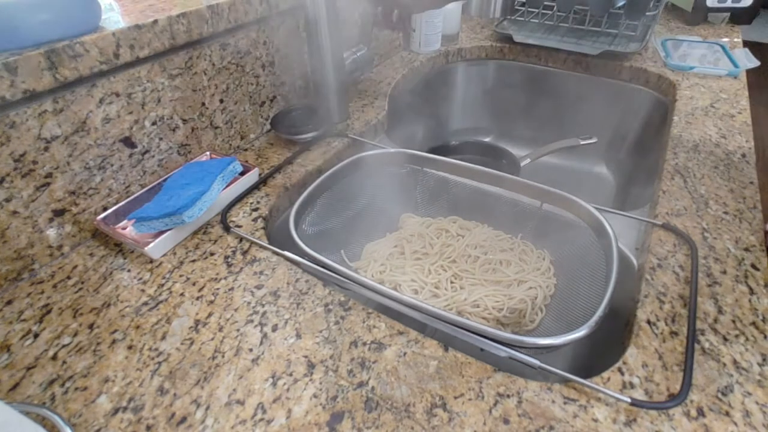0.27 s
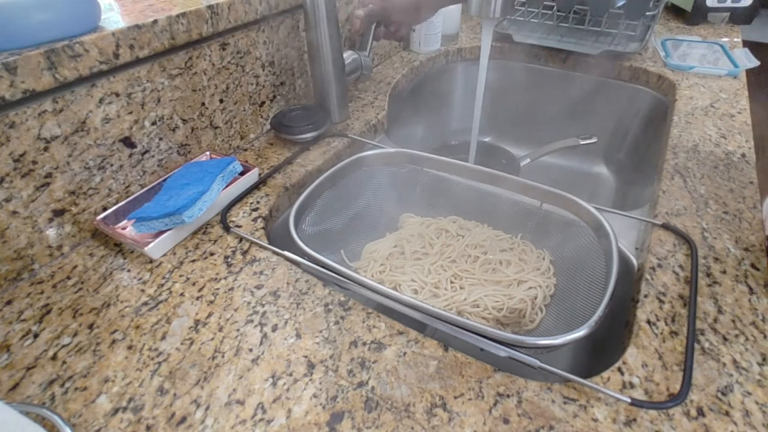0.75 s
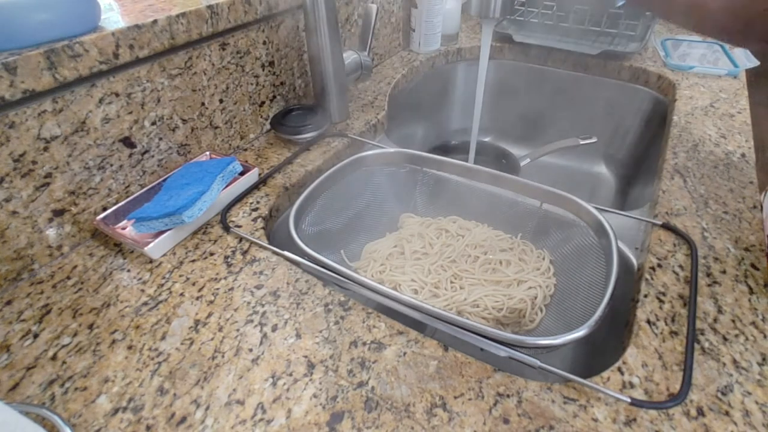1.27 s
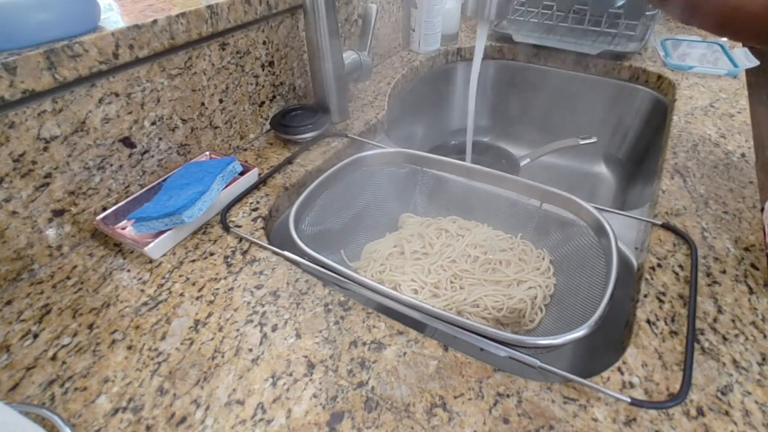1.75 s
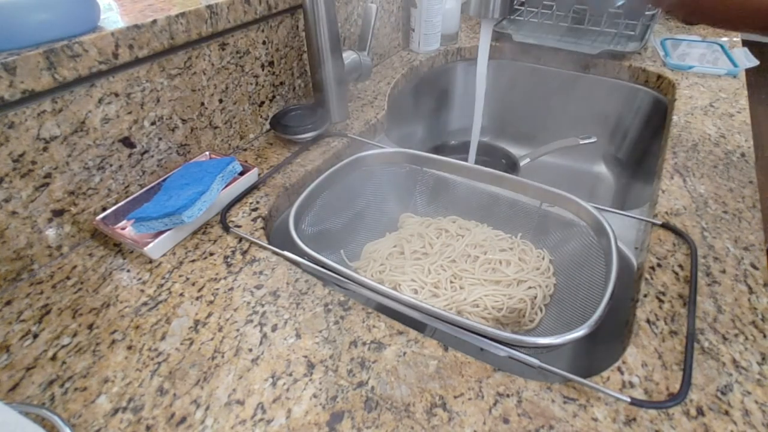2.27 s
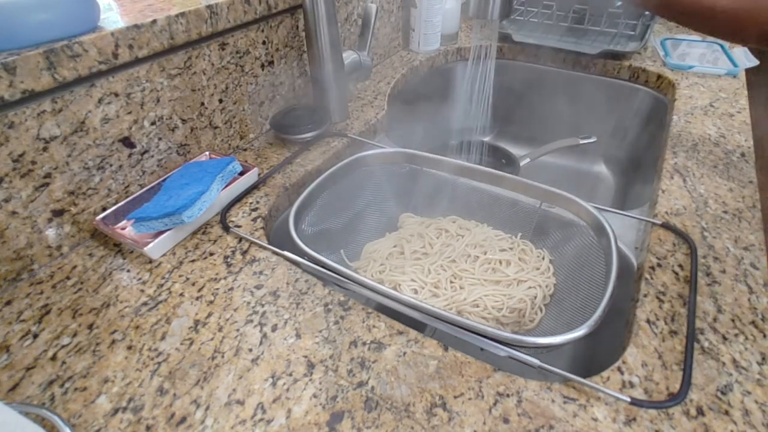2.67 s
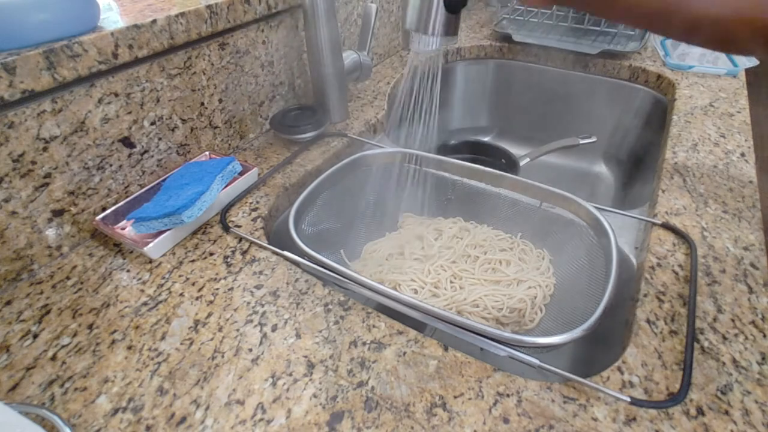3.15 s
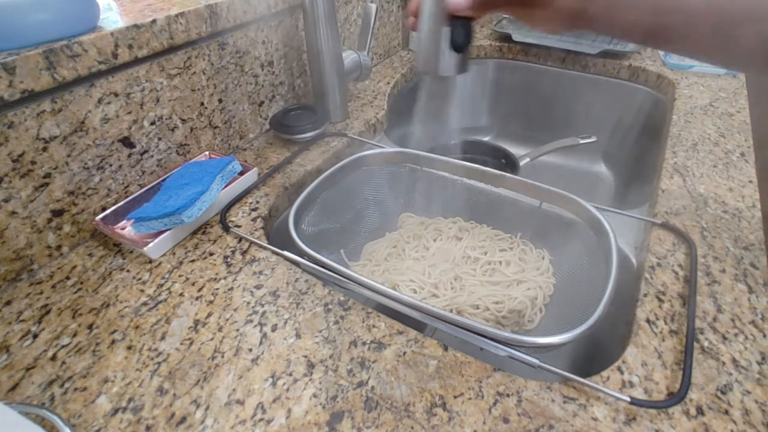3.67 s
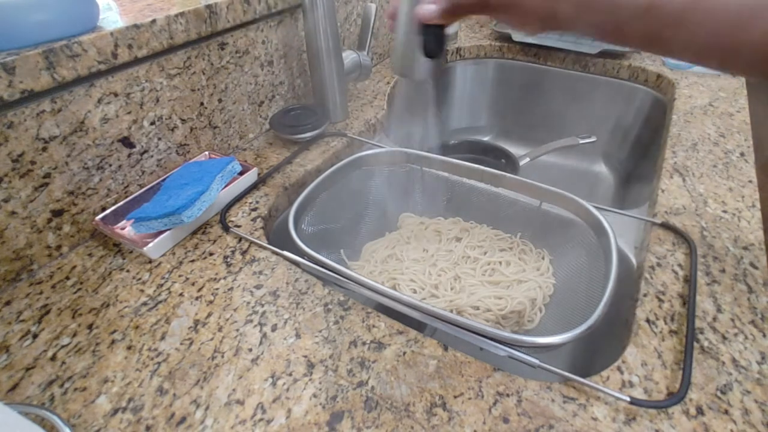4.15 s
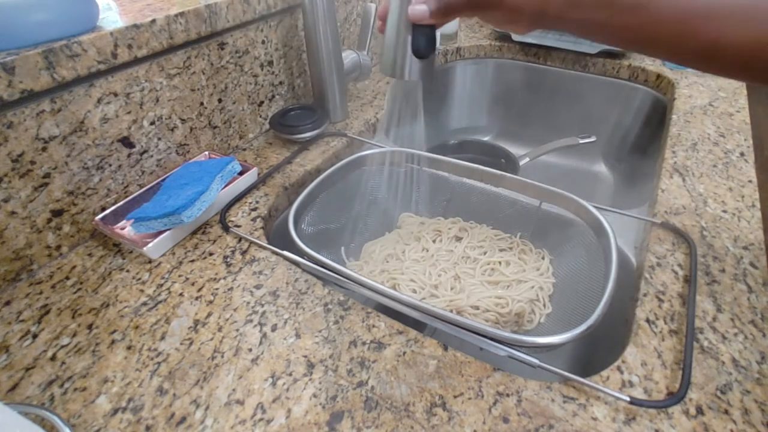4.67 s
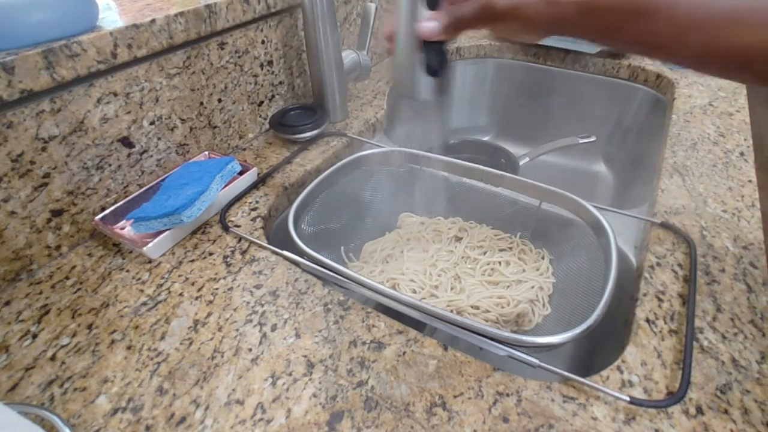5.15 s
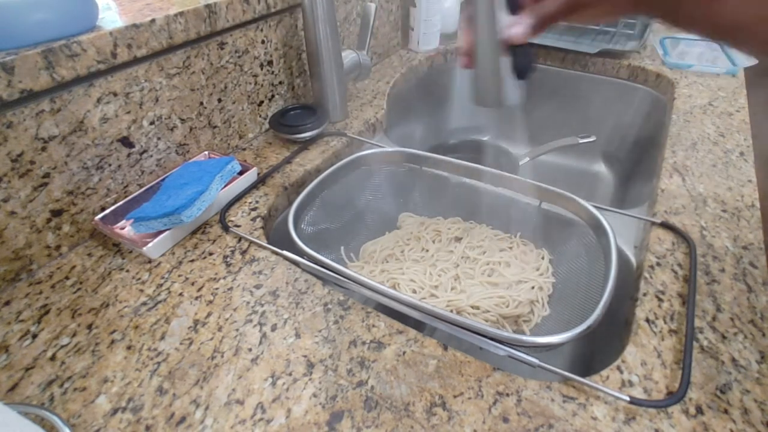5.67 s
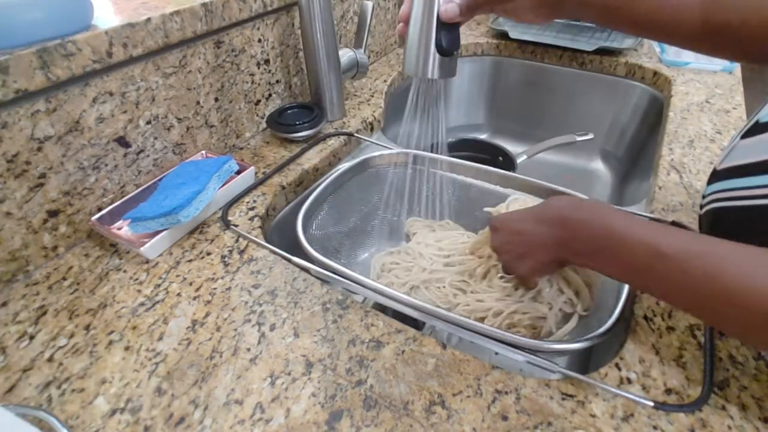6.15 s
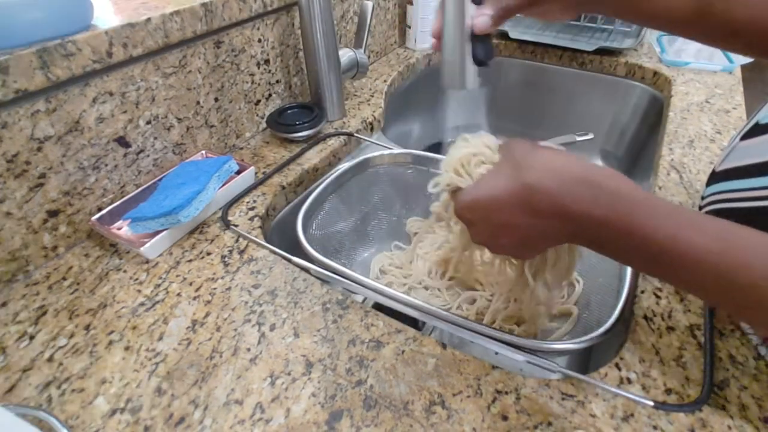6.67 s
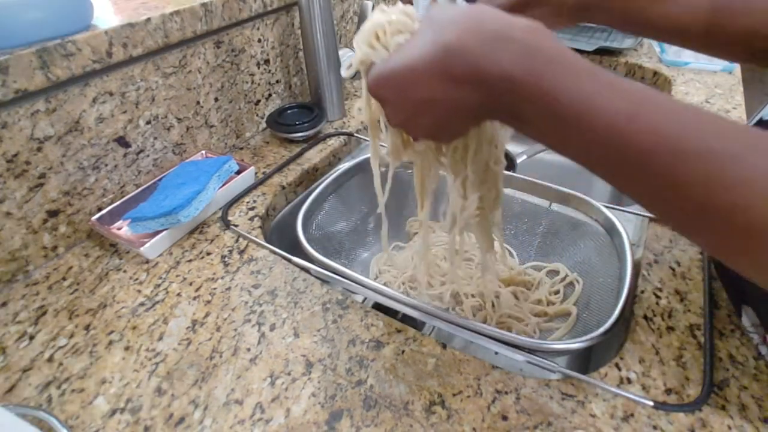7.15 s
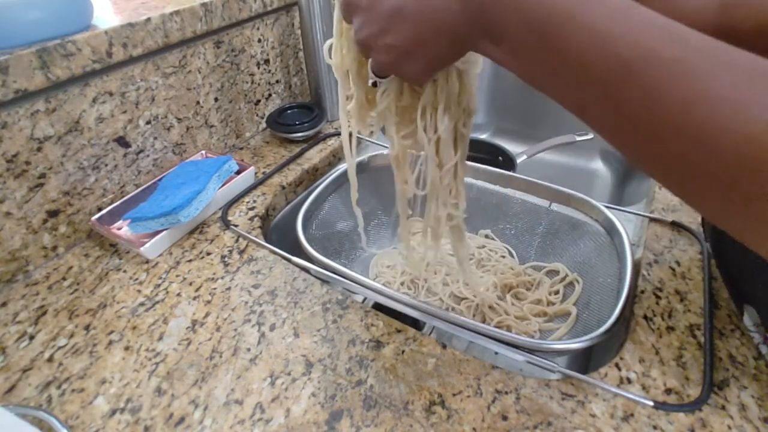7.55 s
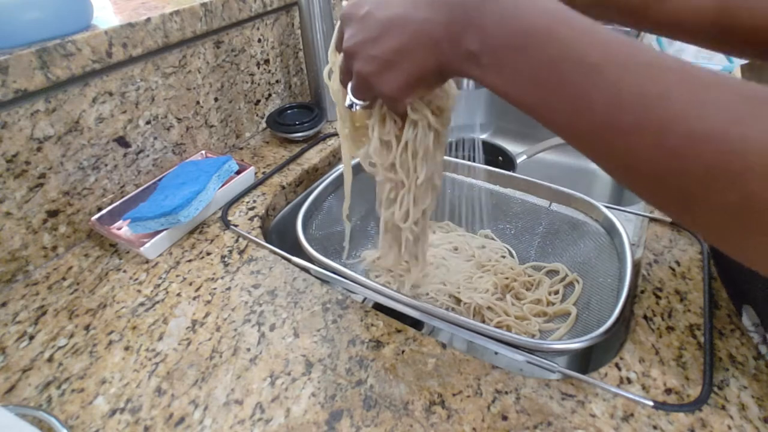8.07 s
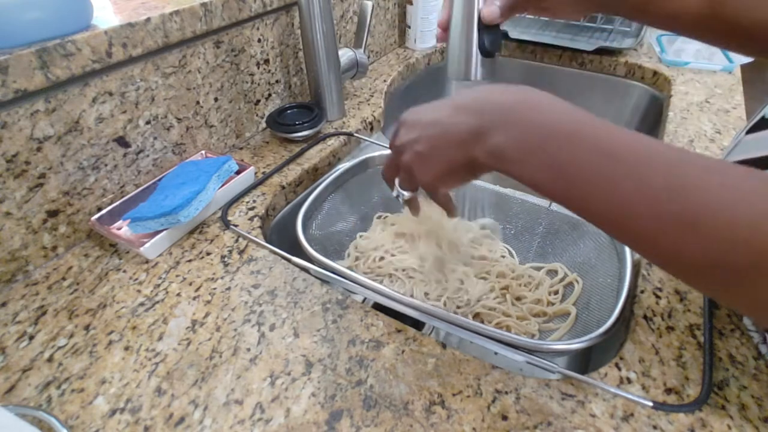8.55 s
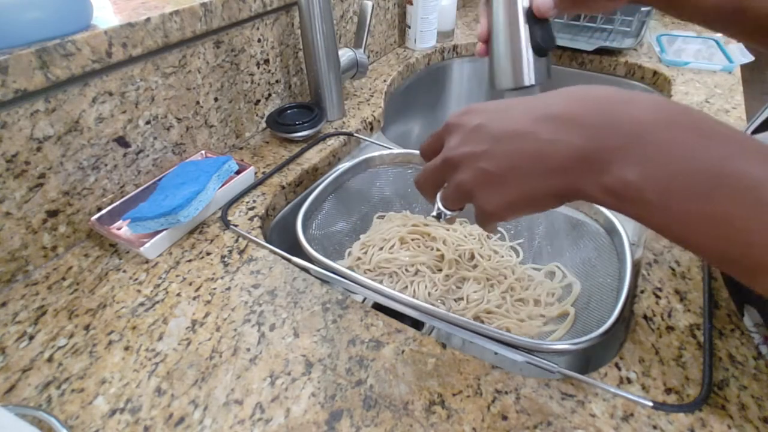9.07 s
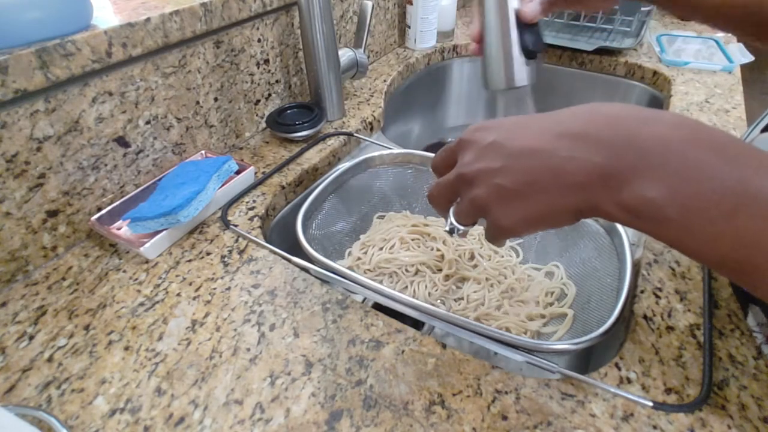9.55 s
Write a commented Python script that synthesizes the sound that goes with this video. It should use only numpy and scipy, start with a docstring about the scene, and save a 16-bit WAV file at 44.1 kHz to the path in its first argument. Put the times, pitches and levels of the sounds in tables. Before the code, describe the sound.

Hollow low gulps of draining water, a gently ringing tap stream, then a crisp spray sweeping across wet noodles while the sink drain gurgles again.

```python
"""First come a faint fizz and loud glugs: hot pasta water runs down the drain of a steel kitchen sink.
The glugs are gliding tones with showers of bubbles around them. Then the tap opens with a soft, airy stream
made of hiss, a hollow ring and splashing drops. It switches to a sprayer, made of hiss, droplet ticks and
bubbles, that drums on the basin and sweeps over noodles in a mesh strainer while the drain gurgles again.
Fat drops, soft bumps, a short echo and a quiet kitchen complete the scene."""
import sys
import numpy as np
from scipy import signal
from scipy.fft import rfft, irfft, next_fast_len
from scipy.io import wavfile
from scipy.ndimage import uniform_filter1d, map_coordinates

SR = 44100
rng = np.random.default_rng(int(sys.argv[2]) if len(sys.argv) > 2 else 0)


def unload_wav(signal):
    """Save mono or channel-first audio to the path in sys.argv[1] as 16-bit WAV at rate SR, clipped to [-1, 1]."""
    wavfile.write(
        sys.argv[1],
        SR,
        np.round(np.clip(np.atleast_2d(signal).T, -1, 1) * 32767).astype(np.int16),
    )


N = 432621  # length in samples

# The room and the stereo picture
# the kitchen's quiet background: (frequency [Hz], level [dB])
KITCHEN_TONE = [(25, -35), (60, -22), (120, -16), (200, -3), (270, 7), (450, -3), (620, -3.5),
                (1000, -16.5), (4000, -21), (16000, -25)]
# colour and level of the echo: (frequency [Hz], level [dB])
ECHO_TONE = [(300, -22), (800, -10), (5000, -8), (10000, -10)]
ECHO_T60 = .16  # time for the echo to fall by 60 dB [s]
# how alike left and right are: (frequency [Hz], likeness [0 to 1])
LEFT_RIGHT_LIKENESS = [(100, .94), (330, .98), (600, .8), (1200, .58), (2500, .45), (5000, .05),
                       (7000, .38), (9000, .7), (12000, .58), (16000, .58)]
# how much louder left is than right: (frequency [Hz], difference [dB])
LEFT_RIGHT_LEAN = [(300, 1.3), (700, -1.5), (1200, 3), (1900, 1), (2500, -3.5), (3300, -2.5), (5000, -2.5),
                   (6500, -3.5), (9000, -4), (12000, -2)]
TOP_HZ = 15950  # nothing is kept from here up
# extra left-right difference: the stream is one spot, the spray is scattered [dB]
STREAM_SIDE_DB, PATTER_SIDE_DB, PLOP_SIDE_DB = -24, 3, 4

# Bumps and single drops
# soft bumps on the counter: (time [s], level before the pulse shape [dB])
BUMPS = [(0.26, -38), (6.044, -25)]
# fat drops and splats: (time [s], level before shaping [dB], pitch [Hz], 60 dB fall of the bubble note [s])
FAT_DROPS = [(.532, -47, 4350, .03), (.769, -32, 5400, .02), (1.063, -32, 3880, .015),
             (1.204, -34, 4470, .02), (1.428, -29.5, 3350, 0.011), (1.456, -24, 4200, 0.0088),
             (1.589, -36, 3300, .012), (1.641, -26, 5330, .012), (1.692, -35, 4600, .008),
             (1.748, -34, 2900, .008), (1.75, -30, 5300, .008), (1.798, -40, 1030, .04),
             (1.816, -30, 5600, .02), (1.929, -30.5, 2480, 0.047), (2.254, -39.5, 870, 0.056),
             (2.847, -30, 3650, .008), (3.764, -26, 1450, .003), (3.7673, -29, 1900, .007),
             (3.948, -36, 1980, .015), (4.272, -31, 1080, 0.043), (4.284, -28, 1210, 0.069),
             (5.12, -30, 2550, .025), (5.209, -32, 1910, .01), (5.515, -28.5, 2640, .015),
             (5.57, -32, 1300, 0.027), (5.585, -30.5, 1170, 0.06), (5.688, -31, 1810, .015),
             (5.867, -30, 2580, .025), (6.2, -28, 2960, .018), (6.234, -31, 2220, .01),
             (6.452, -33, 2580, .015), (6.523, -23, 3080, .01), (7.397, -26.5, 4680, .01),
             (7.456, -32, 1600, 0.03), (7.646, -32, 1040, 0.033), (7.717, -29, 1560, 0.053),
             (8.467, -30, 3300, .02), (8.493, -30, 2880, .025), (9.052, -32.5, 1570, .05),
             (9.209, -31, 1540, 0.055)]
SPLAT_TONE = [(200, -19), (900, -1.5), (5000, 4.5), (15000, -12)]  # (frequency [Hz], level [dB])
SLAP_CYCLES = 6.7  # cycles until a drop's slap has fallen by 60 dB
SLAP_WIDTH = 0.3  # a slap spreads this share above and below its note

# The strainer and the drain
# the last hot water running through the mesh: (time [s], level [dB])
TRICKLE_LEVEL = [(0, -60), (.2, -59), (.33, -65), (.5, -59), (.6, -69), (1.5, -69), (1.9, -82)]
# its colour: (frequency [Hz], level [dB])
TRICKLE_COLOUR = [(250, 13.5), (550, 15), (950, 1), (4500, -5), (6500, -13), (7050, 2), (7700, -11),
                  (11000, -9), (16000, -27)]
# gulps of air through the drain: (time [s], level before the pipe [dB], middle pitch [Hz], 60 dB fall [s])
AIR_GULPS = [(.15, -45, 260, .07), (.197, -40, 265, .08), (.259, -34.5, 271, 0.12), (.287, -31.5, 301, 0.5),
             (.335, -20.5, 318, 0.025), (.365, -27.5, 180, 0.091), (.405, -32, 180, .05),
             (.425, -27.5, 303, 0.11), (.462, -32, 170, 0.058), (.482, -24.5, 260, 0.091),
             (.503, -22.5, 220, 0.042), (.52, -20.5, 245, 0.078), (.515, -36, 150, .05),
             (.58, -31, 148, 0.064), (.638, -28.5, 289, 0.11), (.661, -30.5, 283, 0.21),
             (.847, -31, 274, 0.1), (.864, -26.5, 271, 0.28), (.915, -26, 285, 0.26),
             (1.016, -22.5, 273.4, 0.29), (1.081, -18.5, 293, 0.064), (1.102, -30, 282, 0.14),
             (1.173, -26.5, 308, 0.066), (1.788, -43.5, 285, 0.074), (1.968, -48, 286, 0.043),
             (2.07, -38, 298, 0.06), (2.25, -44, 275, .09), (2.3, -39, 291, 0.21), (2.369, -31, 249, 0.11),
             (2.94, -28.5, 240, 0.14), (3.361, -38.5, 368, 0.13), (4.439, -36, 360, 0.12),
             (4.512, -29.5, 349, 0.11), (4.61, -32, 347, .09), (4.68, -41, 315, .15),
             (4.775, -32, 325, 0.056), (4.952, -30, 314, 0.064), (4.988, -28, 300, 0.034),
             (5.048, -28.5, 272, 0.073), (5.178, -29, 275.6, 0.23), (5.342, -27.5, 251, 0.18),
             (5.367, -28.5, 282, 0.05), (5.523, -28.5, 250, 0.28), (5.6, -23.5, 260, 0.079),
             (5.638, -25.5, 238, 0.27), (5.712, -39, 241, .12), (5.795, -33.5, 302, 0.14),
             (5.934, -22, 244, 0.15), (5.971, -30, 252, 0.064), (6.005, -24.5, 229, 0.11),
             (6.086, -29.5, 318, 0.059), (6.55, -40, 170, 0.082), (8.125, -41, 285, 0.074),
             (8.44, -42, 283, 0.17)]
# what the pipe lets out of a gulp: (frequency [Hz], gain [dB])
PIPE_GAIN = [(60, -18), (130, -8), (175, -4.5), (380, 0), (600, -11)]
GULP_SWELL_S, SETTLE_S = 0.01, 0.062  # a gulp swells, and its pitch settles
# small bubbles around the gulps: (frequency [Hz], level [dB])
SMALL_BUBBLE_TONE = [(30, -50), (90, -38), (170, -29), (225, -2), (275, 5.5), (330, 0), (375, 0),
                     (450, -24.5), (600, -28), (1000, -55), (2500, -110)]
# water running off into the drain: (time [s], small bubbles before random drift [dB])
RUNOFF_LEVEL = [(1.4, -76), (1.9, -61.5), (2.4, -54), (2.8, -60), (3.2, -63), (4.05, -65), (4.25, -57.5),
                (4.42, -47), (4.55, -44), (6.0, -43.5), (6.17, -54.5), (7.6, -61), (8.7, -64.5),
                (9.8, -60.5)]
SHED_DB = -10.5  # small bubbles shed by each gulp, against its own level
# large bubbles deep in the pipe: (frequency [Hz], level [dB])
DEEP_TONE = [(40, -14.0), (100, 0.0), (190, 4.5), (400, 10), (1500, -75)]
DEEP_DB, DEEP_SHED_DB = -69.5, -33.5  # steady large bubbles, and those shed by each gulp
DEEP_STOP_S, DEEP_FADE_DB = 8.8, 21  # the steady ones die down towards the end
# the drain backs up under the spray; the gulps tend to get lower and louder
CHOKE_START_S, CHOKE_END_S = 4.5, 6.0
CHOKE_HZ, CHOKE_SAG_HZ_PER_S = 344.3, 68
CHOKE_DB, CHOKE_RISE_DB_PER_S, CHOKE_T60 = -43, 4, 0.19
CHOKE_SAG = .04  # the choked drain holds each pitch more steadily
# the choked drain catches for a moment: (time [s], dip [dB], half-width [s])
CHOKE_CATCHES = [(5.28, 15, 0.024), (5.475, 6, 0.02), (5.76, 13, 0.017), (5.89, 1, 0.013)]

# The tap
# the lever opens the tap, is pushed further, then switches to the sprayer [s]
TAP_ON_S, PUSH_S, PUSH_LENGTH_S, SPRAY_ON_S = 0.55, 1.726, 0.19, 2.368
# hiss of the aerator, the air mixer in the spout: (time [s], level [dB])
FIZZ_LEVEL = [(.55, -41), (.85, -39.5), (1.2, -39), (1.6, -41.5), (1.78, -42), (2.0, -36), (2.37, -36)]
# colour of that fizz: (frequency [Hz], level [dB])
FIZZ_TONE = [(300, -54), (900, -52), (2300, -37), (4000, -6), (6000, -3.5), (7100, 8.5), (8300, 4.5),
             (9400, 9.5), (10000, 7), (11600, 7), (12400, 1), (16000, 1)]
# hollow ring of the spout: (frequency [Hz], width [Hz], level [dB])
SPOUT_MODES = [(1993, 76, 0)]
SPOUT_SHOULDER = [(1760, 160, 0)]  # second, broader ring filter: (frequency [Hz], width [Hz], level [dB])
# the ring ends sharply above its peak: (frequency [Hz], level [dB])
SPOUT_RING_TONE = [(1500, -16), (1720, 0), (1900, 1), (2060, 4), (2200, -26), (3000, -36)]
RING_DB, RING_WAVER_HZ = -21, 30  # ring against the fizz; scale of its wander in pitch
# the stream splashing on steel: (frequency [Hz], level [dB])
SPLASH_TONE = [(300, -43), (1000, -29), (1540, -10.5), (1640, -24), (1900, -5), (2200, -18), (2360, -12),
               (2620, -9), (2900, -8), (3200, -4), (3650, -4.5), (4100, 2), (4700, -2), (5600, 3),
               (8000, -6.5), (16000, -40)]
SPLASH_DB, SPLASH_PUSH_DB = -47.5, 8.5  # splash on the sink floor, and its gain at full flow
DRY_DB, WETTING_S = -9.5, 0.26  # the splash starts weaker, until the steel is wet
# ringing steel under the stream: (frequency [Hz], width [Hz], level [dB])
STREAM_STEEL_MODES = [(726, 25, -2), (937, 86, -0.5), (1220, 90, -3), (1556, 40, 2)]
STEEL_DB, STEEL_FULL_FLOW_DB = -65, -12  # level of the steel ring, and its change at full flow

# The sprayer
SPRAY_RISE_S = 0.018  # the fine jets open
SURGE_DB, SURGE_S, SURGE_FALL_S = 5.5, 0.085, 0.1  # pent-up pressure as the sprayer starts
# spray moving from basin to noodles, later shaded by the hand; base levels before the swings below:
# (time [s], mesh [dB], patter [dB], plops [dB])
SPRAY_LEVELS = [(2.4, -33.5, -39, -49), (2.8, -36.5, -40, -43.5), (3.1, -34, -38.5, -51.5),
                (3.6, -34, -38.5, -49), (5.2, -34, -37.5, -53.5), (5.6, -32.5, -38, -50),
                (6.7, -33, -38, -49), (8.1, -34, -38, -55.5), (8.7, -34.5, -43, -53.5),
                (9.8, -34, -42, -59)]
# sizzle on the mesh: (frequency [Hz], level [dB])
MESH_TONE = [(800, -58), (2500, -12.5), (4500, -8.5), (6800, -4), (8200, -6), (8800, -6.5), (9300, 0),
             (9900, -5), (10600, -0.5), (11100, -5), (11650, 1), (12500, -5.5), (14000, -4), (16000, -7)]
# patter on the noodles: (frequency [Hz], level [dB])
PATTER_TONE = [(300, -47), (1200, -9), (1650, -7.5), (2000, 0.5), (2200, 0.5), (2520, 3.5), (3200, -1),
               (3700, 1), (5500, -0.5), (8000, -11.5), (16000, -2)]
# plops in the water between the noodles: (frequency [Hz], level [dB])
PLOP_TONE = [(60, -47), (200, -22), (460, -4), (580, -1), (660, -9.5), (800, 4.5), (920, -1.5), (1060, 5.5),
             (1170, -5), (1275, 4), (1450, -5), (1590, 1.5), (2000, 4), (5000, -49)]
# the spray head turns at the strainer's rim or the hand shades it; a negative dip is a rise:
# (time [s], dip of the patter [dB], dip of the sizzle [dB], half-width [s])
SPRAY_LULLS = [(3.53, 7.5, 5, 0.066), (3.99, 3, -1.5, 0.022), (4.49, 8.5, 1.5, 0.025),
               (4.925, 6.5, 4.5, 0.022), (5.345, 8, 4, 0.03), (6.81, 4, 3, 0.088), (7.2, 5, 1.5, 0.022),
               (8.21, 2.5, 3.5, 0.033), (8.44, 1, 3.5, 0.015), (8.605, 6, 2, 0.029),
               (8.82, 7.5, 1.5, 0.048), (9.12, 5, 3, 0.044), (9.405, 6.5, 5.5, 0.042),
               (9.68, -0.5, 2.5, 0.022)]
PLOP_LULL = 0.74  # share of the patter's dip felt by the plops
# the jets cross water pooled among the noodles: (time [s], rise of the plops [dB])
PUDDLE_CROSSINGS = [(3.39, 5), (3.77, 5), (4.29, 6), (4.62, 7.5), (4.79, 0), (5.04, 9), (5.21, 4),
                    (5.85, 1), (6.1, 4), (6.33, 1), (6.65, 6), (6.98, 5.5), (7.33, 7), (7.66, 6),
                    (8.03, 10), (8.95, 2), (9.23, 6), (9.6, 6)]
PUDDLE_S = 0.029  # half-width of a crossing
# the jets catch loose noodles and spatter: (time [s], rise of the patter [dB], half-width [s])
NOODLE_SPATTERS = [(3.81, 2, .04), (4.38, 1, .03), (4.71, 3, .025), (5.13, 4, 0.022), (5.88, 1.5, .025),
                   (6.17, 2.5, .02), (6.48, 4.5, 0.026), (6.68, 2.5, .014), (7.96, 2, 0.023),
                   (8.5, 1, 0.011), (8.555, 5, 0.011), (8.94, 3, .035), (9.24, 4.5, 0.045),
                   (9.56, 4.5, 0.039)]
SPIT_DB = -10.5  # coarse droplets that smack on noodles and rim, against the patter
# their colour: (frequency [Hz], level [dB])
SPIT_COLOUR = [(400, -23.5), (800, -6), (2500, -2), (4500, 6), (9000, 7), (16000, -18)]
# the wet noodles ring hollow where they spatter: (frequency [Hz], width [Hz], level [dB])
HOLLOW_MODES = [(1860, 180, -5.5), (2550, 170, -5), (3030, 260, -1)]
HOLLOW_DB = -43.5  # scaled by the spatter's rise in gain
WALL_PAN_DB, NOODLE_PAN_DB = 3, 4.5  # how much louder the sizzle is on the left
LOW_JETS_DB, LOW_JETS_S = 3.5, 0.14  # the plops start this much stronger, then settle
# jets reaching the bare basin: (start [s], end [s], back wall [dB], floor [dB], corner [dB])
BASIN_CONTACTS = [(2.465, 2.9, -44, -68, -68), (2.962, 3.12, -70, -80, -48.5),
                  (3.27, 3.44, -65, -85, -49.5), (4.74, 4.83, -83, -80, -50.5),
                  (5.59, 5.803, -80.5, -60, -72), (9.083, 9.9, -80, -57, -80), (9.303, 9.9, -78, -72, -80)]
BASIN_FADE_S, STRAY_DB = 0.045, -61.5  # the jets slide on and off; a few always reach the floor
# ringing steel of the basin's wall: (frequency [Hz], width [Hz], level [dB])
WALL_MODES = [(223, 21, 0.5), (460, 20, 5), (780, 79, -5), (920, 37, 1), (1070, 70, -1), (1284, 45, 0.5),
              (1600, 90, -4.5), (1980, 78, -2.5)]
# its floor: (frequency [Hz], width [Hz], level [dB])
FLOOR_MODES = [(322.6, 20, -2.5), (580, 54, -5), (779, 12, -5), (1273, 60, -18), (1590, 59, -13)]
# its corner: (frequency [Hz], width [Hz], level [dB])
CORNER_MODES = [(820, 37, 1), (1990, 70, -5.5)]


def amp(db):
    """Turn decibels into gain."""
    return 10 ** (np.asarray(db) / 20)


def unit(x):
    """Scale to an average (rms) strength of 1."""
    return x / np.sqrt(np.mean(x ** 2) + 1e-20)


def along(points, hz):
    """Read (frequency, value) points on a log frequency axis."""
    f, value = np.transpose(points)
    return np.interp(np.log(hz + 1), np.log(f + 1), value)


def curves(rows):
    """Give one value per sample for each column after the time."""
    s, *cols = np.transpose(rows)
    return [np.interp(np.arange(N) / SR, s, c) for c in cols]


def opening(start, length):
    """A straight ramp from shut (0) to open (1)."""
    return np.clip((np.arange(N) / SR - start) / length, 0, 1)


def swell(s, width):
    """A bell-shaped rise from 0 to 1 and back, around time s."""
    return np.exp(-.5 * ((np.arange(N) / SR - s) / width) ** 2)


def wobble(rate):
    """A smooth random curve with `rate` random points a second."""
    points = rng.standard_normal(int(N * rate / SR) + 4)
    return map_coordinates(points, [np.arange(N) * rate / SR])


def filtered(x, response):
    """Multiply the spectrum of x by a response that depends on frequency."""
    m = next_fast_len(N + SR // 2)
    return irfft(rfft(x, m) * response(np.fft.rfftfreq(m, 1 / SR)), m)[..., :N]


def shaped(x, spectrum):
    """Colour x with (frequency, dB) points."""
    return filtered(x, lambda hz: amp(along(spectrum, hz)))


def resonate(x, modes):
    """Let x ring at (frequency, width, dB) resonances, summed with alternating sign."""
    def response(f):
        total = 0
        for k, (centre, width, db) in enumerate(modes):
            damping = 1j * f * width
            total = total + (-1) ** k * amp(db) * damping / (centre * centre - f * f + damping)
        return total
    return filtered(x, response)


def spread(pair, side_db=0):
    """Blend two unrelated signals into left and right of rms 1, as alike as the table says at side_db 0."""
    def mid_side(hz):
        turn = np.arccos(np.clip(along(LEFT_RIGHT_LIKENESS, hz), -1, 1)) / 2
        return np.array([np.cos(turn), amp(side_db) * np.sin(turn)])
    mid, side = filtered(pair, mid_side)
    stereo = np.array([mid + side, mid - side])
    return unit(filtered(stereo, lambda hz: amp(np.outer([.5, -.5], along(LEFT_RIGHT_LEAN, hz)))))


def patchy(x, depth_db, bins, frames):
    """Narrow colours come and go: a random level field, smoothed over frequency bins and time frames."""
    z = signal.stft(x, nperseg=1024)[2]
    field = uniform_filter1d(rng.standard_normal(z.shape[1:]), bins, 0)
    field = uniform_filter1d(field, frames, 1)
    return unit(signal.istft(z * amp(depth_db * unit(field)), nperseg=1024)[1][:, :N])


def add(track, s, sound):
    """Mix a sound into the track at time s."""
    part = track[..., round(s * SR):][..., :sound.shape[-1]]
    part += sound[..., :part.shape[-1]]


def hiss():
    """Two unrelated white noises."""
    return rng.standard_normal((2, N))


def ticks(rate, scatter_db):
    """Two showers of one-sample droplet impacts of uneven size, about `rate` a second each."""
    return unit((rng.random((2, N)) < rate / SR) * np.sign(hiss()) * amp(scatter_db * np.clip(hiss(), -2, 2)))


def bubbles(count, low_hz, high_hz, cycles, scatter_db, size):
    """Two showers of tiny ringing bubbles, each rising in pitch as it dies; size is in samples."""
    t = np.arange(size) / SR
    when, pitch, life, weight, side = rng.random((count, 5)).T
    hz = low_hz * (high_hz / low_hz) ** pitch
    age = np.outer(hz / (cycles * (.5 + life)), t)
    strength = amp(scatter_db * np.minimum(-np.log(1 - weight), 4)) * np.sqrt(hz / low_hz)
    turn = 2 * np.pi * np.outer(hz, t) * (1 + 0.042 * np.minimum(age, 2))
    rings = strength[:, None] * np.exp(-np.pi * age) * np.sin(turn)
    # both sides lie end to end in one long track; each bubble picks one
    where = (when * N).astype(int) + N * (side > .5)
    places = (where[:, None] + np.arange(size)).ravel()
    return unit(np.bincount(places, rings.ravel(), 2 * N)[:2 * N].reshape(2, N))


def quiet_kitchen(level_db=-61):
    """Steady noise coloured like a still room."""
    return amp(level_db) * spread(shaped(hiss(), KITCHEN_TONE))


def kitchen_echo(x, count=24):
    """Stone counter and walls return a short noisy tail that changes as the water moves about."""
    t, wet = np.arange(SR // 4) / SR, np.zeros((2, N))
    for part in np.array_split(np.arange(N), count):
        tail = rng.standard_normal((2, len(t))) * amp(-60 * t / ECHO_T60) * (t > .002)
        add(wet, part[0] / SR, signal.fftconvolve(x[:, part], tail / np.linalg.norm(tail[0]), axes=1))
    return shaped(wet, ECHO_TONE)


def bumps(push=0.00046):
    """Each bump is one soft low push, with no ring; push is its time scale in seconds."""
    out, u = np.zeros(N), np.arange(SR // 20) / SR / push
    for s, db in BUMPS:
        add(out, s, amp(db) * np.e * u * (1 - u / 2) * np.exp(-u))
    return out


def trickle():
    """A faint fizz of hiss and droplet ticks that fades as the strainer empties."""
    return spread(shaped(hiss() + 2.6 * ticks(2000, 4.9), TRICKLE_COLOUR)) * amp(curves(TRICKLE_LEVEL)[0])


def splats(level_db=-1, slap=0.62, note_db=-5, rise_per_s=4):
    """A fat drop slaps with a short crackle around its pitch and leaves a brief, rising bubble note."""
    out, t = np.zeros((2, N)), np.arange(SR // 12) / SR
    for s, db, hz, t60 in FAT_DROPS:
        turn = 2 * np.pi * hz * t * (1 + rise_per_s * t) + rng.uniform(0, np.pi / 3, (2, 1))
        envelope = slap * amp(-60 * t * hz / SLAP_CYCLES) + amp(note_db - 60 * t / t60)
        band = signal.butter(2, [hz / (1 + SLAP_WIDTH), hz * (1 + SLAP_WIDTH)], "band", fs=SR)
        note = signal.lfilter(*band, envelope * np.sin(turn))
        crackle = unit(signal.lfilter(*band, rng.standard_normal((2, len(t)))))
        add(out, s, amp(db + level_db) * (note + 0.4 * crackle * amp(-60 * t / 0.027)))
    return shaped(out, SPLAT_TONE)


def gulping(rows, sag, scoop=.16, scoop_s=.012):
    """Gulps of air: each swells and scoops up to its pitch, then sags and dies away."""
    out, t = np.zeros(N), np.arange(SR // 3) / SR
    for s, db, hz, t60 in rows:
        rise = np.sin(np.pi / 2 * np.minimum(t / GULP_SWELL_S, 1)) ** 2
        envelope = rise * amp(db - 60 * np.maximum(t - GULP_SWELL_S, 0) / t60)
        pitch = hz * (1 + sag * (np.exp(-t / SETTLE_S) - .5) - scoop * np.exp(-t / scoop_s))
        add(out, s, envelope * np.sin(2 * np.pi * np.cumsum(pitch) / SR))
    return out


def choking(count=40, scatter_db=-1.5, detune=0.082):
    """Uneven gulps of the backed-up drain, as rows like AIR_GULPS."""
    slip, size, tune = rng.uniform(-1.2, 1, (count, 3)).T
    age = (np.arange(count) + .5 + 0.361 * slip) / count * (CHOKE_END_S - CHOKE_START_S)
    db = CHOKE_DB + CHOKE_RISE_DB_PER_S * age + scatter_db * size
    hz = (CHOKE_HZ - CHOKE_SAG_HZ_PER_S * age) * (1 + detune * tune)
    return list(zip(CHOKE_START_S + age, db, hz, np.full(count, CHOKE_T60)))


def small_bubbles(stir, lumps_db=2.2, drift_db=0.5):
    """Small bubbles and ticks come from the run-off and from water stirred by the gulps."""
    runoff_db, = curves(RUNOFF_LEVEL)
    small = bubbles(2400, 210.1, 411.4, 27.5, 2.43, size=2400) + 0.39 * ticks(450, 1.7)
    level = np.hypot(amp(runoff_db + drift_db * wobble(12.0)), amp(SHED_DB) * stir)
    return spread(shaped(small, SMALL_BUBBLE_TONE)) * level * amp(lumps_db * wobble(30))


def deep_bubbles(stir):
    """Large, low bubbles in the pipe: a steady bed plus those shed by each gulp."""
    large = shaped(bubbles(600, 97.0, 185, 8.1, 4.7, size=5000), DEEP_TONE)
    steady_db = DEEP_DB - DEEP_FADE_DB * opening(DEEP_STOP_S, 0.43) + 1.9 * wobble(5.2)
    return spread(large) * np.hypot(amp(steady_db), amp(DEEP_SHED_DB) * stir)


def drain(sag=0.15, linger_s=0.07):
    """Each gulp of air swells and rings in the pipe, and stirs up smaller and deeper bubbles."""
    pause = amp(-sum(db * swell(s, width) for s, db, width in CHOKE_CATCHES))
    choked = pause * gulping(choking(), CHOKE_SAG, scoop=0.047)
    gulps = shaped(gulping(AIR_GULPS, sag) + choked, PIPE_GAIN)
    stir = np.sqrt(np.abs(uniform_filter1d(gulps ** 2, int(linger_s * SR))))  # running loudness of the gulps
    # both channels get the same gulp, slightly louder on the left
    return gulps * amp([[.3], [-.3]]) + pause * small_bubbles(stir) + deep_bubbles(stir)


def aerator_fizz(air_db, pan_db=3):
    """The airy stream makes a soft hiss whose level wavers, a little louder on the left."""
    fizz = patchy(shaped(hiss() + 0.42 * ticks(4000, 2.6), FIZZ_TONE), depth_db=1.6, bins=4, frames=6)
    fizz = spread(fizz, side_db=STREAM_SIDE_DB) * amp([[pan_db / 2], [-pan_db / 2]])
    return fizz * amp(air_db + 1.6 * wobble(45.17) + 0.33 * wobble(4.2))


def waver(x, depth_hz, rate):
    """Push the pitch of the spout's ring up and down at random by reading it unevenly in time."""
    drift = np.cumsum(wobble(rate)) * depth_hz / SPOUT_MODES[0][0]
    return np.array([map_coordinates(side, [np.arange(N) + drift], mode="mirror") for side in x])


def spout_ring(air_db, flow):
    """Noise through narrow filters rings like the hollow spout, with wandering pitch and level."""
    ring = resonate(resonate(hiss(), SPOUT_MODES), SPOUT_SHOULDER)
    ring = spread(shaped(ring, SPOUT_RING_TONE), side_db=STREAM_SIDE_DB)
    ring_db = air_db + RING_DB + 2.4 * wobble(22) + 1.2 * wobble(8) + 1.2 * flow
    return waver(ring, depth_hz=RING_WAVER_HZ, rate=16) * amp(ring_db) * opening(0.553, 0.05)


def stream_splash(flow):
    """Bubbles, ticks and hiss splash on the sink floor; more flow merges the drops into a rush."""
    wet_db = SPLASH_DB + SPLASH_PUSH_DB * flow + DRY_DB * (1 - opening(TAP_ON_S, WETTING_S)) + 1.1 * wobble(29.65)
    drops = (bubbles(1800, 2560, 8900, 7.8, 1.3, size=400) + 1.0 * ticks(260, 2.8)) * (1.7 - 0.62 * flow)
    splash = patchy(spread(shaped(drops + 4.3 * hiss(), SPLASH_TONE)), depth_db=2.5, bins=6, frames=4)
    return splash * amp(wet_db)


def tap():
    """The aerated stream fizzes, rings in its spout and splashes on the ringing sink floor."""
    flow = opening(PUSH_S, PUSH_LENGTH_S)  # the lever is pushed further
    air_db, = curves(FIZZ_LEVEL)
    valve = 0.074 * opening(0.5, .04) + opening(TAP_ON_S, 0.019)  # it leaks a little before it opens
    steel = spread(resonate(ticks(2500, 3), STREAM_STEEL_MODES)) * amp(STEEL_DB + STEEL_FULL_FLOW_DB * flow)
    stream = aerator_fizz(air_db) + spout_ring(air_db, flow) + steel + stream_splash(flow)
    return stream * valve * (1 - opening(SPRAY_ON_S, 0.099))


def basin():
    """Jets that miss the strainer drum on the steel wall, floor and corner, which ring."""
    wall, floor, corner = 0, amp(STRAY_DB), 0
    for start, end, wall_db, floor_db, corner_db in BASIN_CONTACTS:
        contact = opening(start - BASIN_FADE_S / 2, BASIN_FADE_S) - opening(end - BASIN_FADE_S / 2, BASIN_FADE_S)
        wall = wall + amp(wall_db) * contact
        floor = floor + amp(floor_db) * contact
        corner = corner + amp(corner_db) * contact
    wall_sound = spread(resonate(ticks(1500, 1.7), WALL_MODES)) * wall
    corner_sound = spread(resonate(ticks(1500, 2), CORNER_MODES)) * corner
    floor_sound = spread(resonate(ticks(300, 3.7), FLOOR_MODES)) * floor * amp(3.1 * wobble(12))
    return wall_sound + corner_sound + floor_sound


def mesh_sizzle(level_db, flutter, on_noodles):
    """Fine jets on the mesh make a flickering hiss with ticks, leaning left."""
    pan_db = WALL_PAN_DB + (NOODLE_PAN_DB - WALL_PAN_DB) * on_noodles
    dip_db = sum(db * swell(s, width) for s, _, db, width in SPRAY_LULLS)
    mesh = patchy(spread(shaped(hiss() + 0.63 * ticks(4000, 4.5), MESH_TONE)), depth_db=2.5, bins=12, frames=3)
    flicker_db = 1.16 * flutter + 0.82 * wobble(150) + 0.49 * wobble(18)
    return mesh * amp(level_db - dip_db + flicker_db + np.outer([.5, -.5], pan_db))


def noodle_patter(level_db, flutter):
    """Jets on the noodles make short bubble rings, ticks and hiss, plus coarser smacking droplets."""
    drops = bubbles(11000, 1326, 7070, 28, 1.2, size=420) + 2.44 * ticks(2200, .6) + 1.76 * hiss()
    patter = spread(shaped(drops, PATTER_TONE), side_db=PATTER_SIDE_DB)
    patter = patchy(patter, depth_db=4.2, bins=6, frames=5)
    spit = spread(shaped(bubbles(3000, 1200, 6000, 3, 1.7, size=200), SPIT_COLOUR))
    return (patter + amp(SPIT_DB) * spit) * amp(level_db + 0.2 * flutter + 0.31 * wobble(25))


def puddle_plops(level_db, flutter, on_noodles):
    """Jets in pooled water make longer, lower bubble rings, which swell at each puddle."""
    puddle_db = sum(db * swell(s, PUDDLE_S) for s, db in PUDDLE_CROSSINGS)
    pools = bubbles(4000, 614.6, 2113, 50, 1.06, size=1200) + 1.35 * ticks(1400, .7) + 0.3 * hiss()
    plops = patchy(spread(shaped(pools, PLOP_TONE), side_db=PLOP_SIDE_DB), depth_db=3.4, bins=3, frames=5)
    plops = (.5 + .5 * on_noodles) * plops * amp(level_db + puddle_db + 0.3 * flutter + 1.1 * wobble(12))
    return plops * amp(LOW_JETS_DB * (1.5 - opening(SPRAY_ON_S, LOW_JETS_S)))


def sprayer(patter_surge=0.16):
    """Fine jets sizzle on the mesh, patter on noodles, plop in water and drum on the basin."""
    jets_db, hits_db, pools_db = curves(SPRAY_LEVELS)
    surge_db = SURGE_DB * (1 - opening(SPRAY_ON_S + SURGE_S, SURGE_FALL_S))
    lull_db = sum(db * swell(s, width) for s, db, _, width in SPRAY_LULLS)
    spatter_db = sum(db * swell(s, width) for s, db, width in NOODLE_SPATTERS)
    on_noodles = opening(2.83, 0.63)  # the jets first hit the bare wall, then swing over the strainer
    flutter = wobble(75)  # the jets break up together
    mesh = mesh_sizzle(jets_db + surge_db, flutter, on_noodles)
    patter = noodle_patter(hits_db + spatter_db + patter_surge * surge_db - lull_db, flutter)
    plops = puddle_plops(pools_db - PLOP_LULL * lull_db, flutter, on_noodles)
    hollows = spread(resonate(ticks(2500, 1.5), HOLLOW_MODES)) * amp(HOLLOW_DB) * (amp(spatter_db) - 1)
    spray = mesh + patter + plops + hollows + basin()
    return spray * opening(SPRAY_ON_S - SPRAY_RISE_S / 2, SPRAY_RISE_S)


def scene():
    """Water in the sink, its echo and the quiet kitchen."""
    water = trickle() + drain() + tap() + sprayer() + splats() + bumps()
    return water + kitchen_echo(water) + quiet_kitchen()


def record(dry):
    """Remove everything from TOP_HZ up."""
    return filtered(dry, lambda hz: hz < TOP_HZ)


dry = scene()
out = record(dry)
unload_wav(out)
```